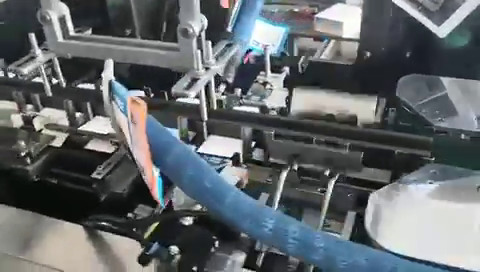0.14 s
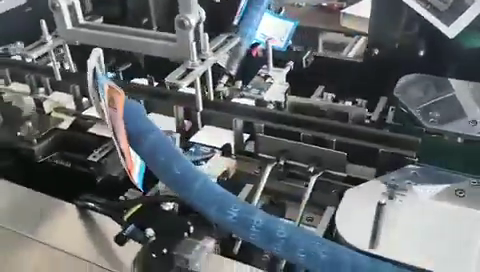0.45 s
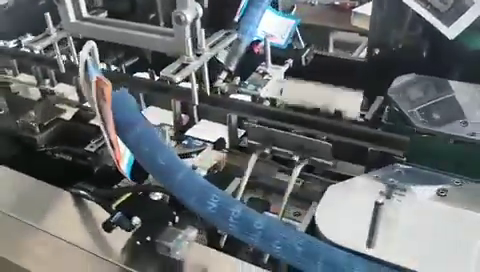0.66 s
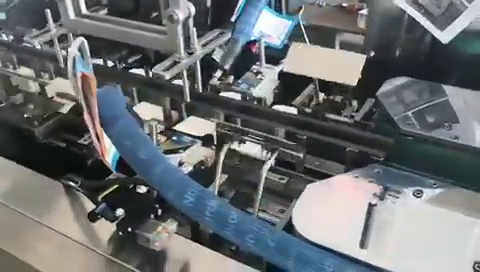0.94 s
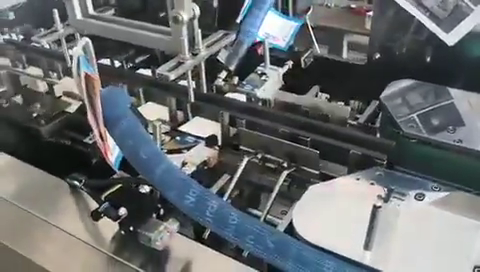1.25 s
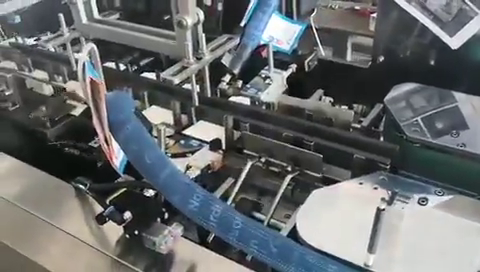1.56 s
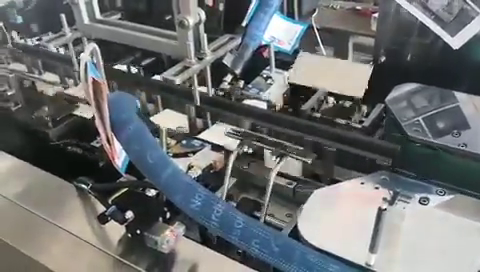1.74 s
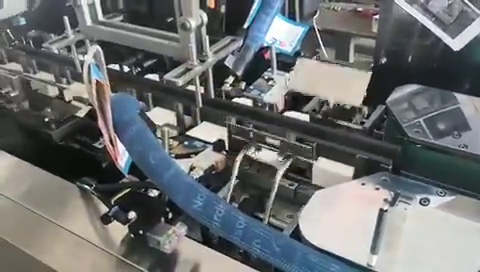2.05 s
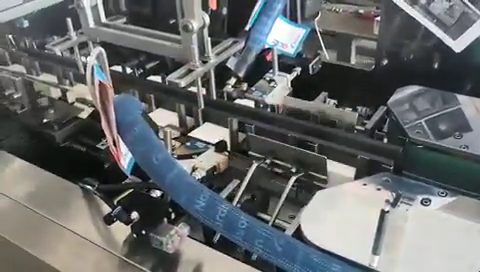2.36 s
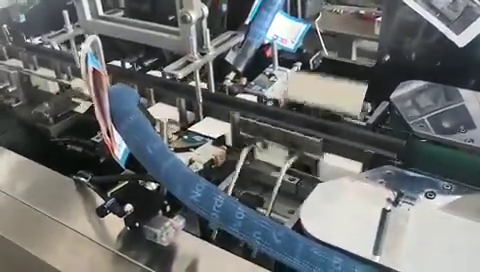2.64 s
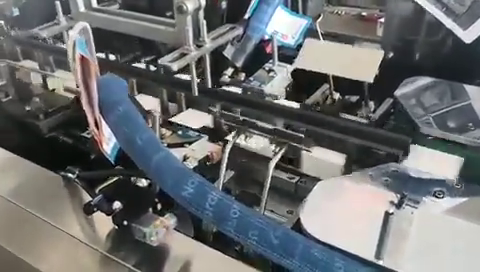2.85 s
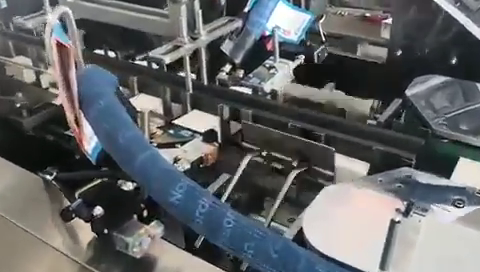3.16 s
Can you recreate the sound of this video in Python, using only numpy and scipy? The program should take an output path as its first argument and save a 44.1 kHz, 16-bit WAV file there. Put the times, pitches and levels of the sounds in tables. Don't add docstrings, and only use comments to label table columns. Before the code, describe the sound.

Close stereo pickup of a packaging machine: clusters of dry metallic clacks and sharp clicks repeat roughly every second, with one deep early thump, puffs of air, steady rumble, thin whine and slight hall echo.

```python
import sys
import numpy as np
from scipy import signal
from scipy.fft import rfft, irfft, next_fast_len
from scipy.io import wavfile

SR = 44100
rng = np.random.default_rng(int(sys.argv[2]) if len(sys.argv) > 2 else 0)


def put_to_file(sound):
    columns = np.atleast_2d(sound).T
    safe = np.clip(columns, -1, 1)
    whole_steps = np.round(safe * 32767)
    wavfile.write(sys.argv[1], SR, whole_steps.astype(np.int16))


def decibels_to_gain(level_db):
    exponent = np.asarray(level_db, float) / 20
    return 10 ** exponent


N = 145530

# frequency in Hz, left-right correlation.
PORT_LIKENESS = [(30,.997),(180,0.95),(300,0.95),(500,0.35),(800,0.37),(1200,.6),(2000,0.53),(5000,0.12)]
# frequency in Hz, left over right in dB.
PORT_BALANCE = [(250, 0), (450, -2), (740, 3), (1220, 0.2), (2010, -5), (2600, -11), (3600, -2),
                (5500, -1.6), (9000, -2.5), (15000, -1.5)]
# frequency in Hz, lead of the left port in radians.
PORT_LEAD = [(300,0),(600,1.03),(1290,0.07),(2760,-3),(4310,-10.4),(6030,-2.5),(8270,-9.5),(12500,1)]

# time in seconds, whirr level in dB, rumble level in dB.
LOAD = [(0,-29.5,-0.5),(.25,-30,-2.5),(.6,-33.5,-1.5),(.8,-35,0),(1.1,-37,-2.5),(1.4,-34,-3),(1.6,-34.5,0.5),(1.9,-35.5,-2),
        (2.2,-35.5,-3),(2.55,-37.5,-1.5),(2.9,-36.5,-4),(3.3,-38.5,-4)]
# frequency in Hz, density in dB per Hz.
RUMBLE = [(12, -29), (20, -2), (80, 1), (215, 1), (312, -8), (370, -6), (412, -12), (527, -17), (800, -15),
          (1040, -22.5), (1760, -120)]
# frequency in Hz, density in dB per Hz.
WHIRR = [(290, -38), (500, -17.5), (1200, -1.5), (1470, -3.5), (2430, 5), (3120, -9), (4480, -11),
         (5080, -9.5), (6000, -14.5), (7800, -85), (13200, -120)]
# frequency in Hz, density in dB per Hz.
LEAK = [(2400, 0), (3000, -4), (4000, -6), (6300, -5.5), (7800, 1.5), (8600, -16), (10000, -17.5),
        (15300, -33)]
# frequency in Hz, density in dB per Hz.
AIR = [(3000, -3), (4500, -9.5), (6200, -6), (7900, 3), (8600, -10), (10000, -33.5), (15000, -22.5),
       (15400, -51)]

WHINE_HZ = [4731, 4911, 5030, 5091, 5270]
WHINE_DB = [-57, -48, -59, -52, -58]
# time in seconds, level of the lower lines in dB, of the upper lines in dB.
DRIVE = [(0,10,7),(.08,-12,-6),(.22,6,1),(.36,-10,-3),(.65,-7,-6),(.8,0.5,-6),(1.4,0,-4),(1.55,-8,-3),(1.88,-8,2),
         (1.96,-12,3),(2.18,-8,1),(2.3,-0.5,0),(2.46,3,-11),(2.55,-10,-4),(2.66,-3.5,-6),(3.3,4,5)]

# frequency in Hz, width in Hz, level in dB.
RAIL = [(2020,60,-54),(2798,80,-31),(3210,270,-32),(4140,200,-38.5),(5500,220,-38)]
# time in seconds, level in dB.
SLIDE = [(0,-1.5),(.04,-5.5),(.14,-2.5),(.21,-7.5),(.27,-17),(.4,-47),(3.3,-40)]

# start in seconds, level in dB, rise in seconds, hold in seconds.
BLOWS = [
    (-.1,-45,.04,0.16),
    (0.342,-45.5,0.074,0.16),
    (1.33,-42.5,0.12,0.19),
    (1.647,-52,0.018,0.024),
    (2.313,-42.5,0.11,0.19),
    (3.24,-54,0.027,.1),
]

# time in seconds, peak in dB, rattle length in seconds, loudest pitch in Hz.
SNAPS = [(0.4625,-13,0.0099,7400),(0.5134,-1,0.0036,7400),(0.606,-10.5,0.0098,6900),(.8599,-8.5,0.0063,5500),(0.906,-12,0.0042,5500),(.9168,-12.5,0.017,7500),
         (1.496,-0.5,0.0054,7950),(1.592,-8,0.01,7340),(1.846,-13.5,0.0073,5100),(1.8906,-9.5,0.006,4260),(1.901,-11.5,0.017,4600),
         (2.4796,-1,0.0062,7950),(2.573,-8,0.013,6500),(2.8747,-8,.004,4160),(2.8897,-16.5,0.02,7500),(3.259,-23,.006,6000)]
# frequency in Hz, level in dB, 60 dB decay in seconds.
SNAP_MODES = [(3300, -8, 0.0019), (4200, 1, 0.0022), (5340, -2.5, 0.0036), (5800, -1.5, 0.0034),
              (6900, -4.5, 0.0061), (7200, 0.5, 0.004), (7810, -1.5, 0.0054), (8840, -10, 0.0034),
              (11300, -11, 0.0012), (14100, -20, 0.0032)]
# time in seconds, peak in dB, hollowness (low modes) in dB,
# rattle length in seconds, loudest pitch in Hz.
CLACKS = [(.46,-2,-2,0.0058,1520),(.471,-4,-4.5,0.0075,1900),(.513,-5,-13,0.0054,2600),(.558,-11,-5,0.0048,1880),(.607,-4,-7.5,0.0046,2010),
          (.798,-11.5,-1.5,0.017,2180),(.86,-15.5,-7,0.0065,2500),(.905,-9.5,-7,.01,2320),(.915,-3.5,-7,0.0056,2620),(.949,-12.5,-4.5,0.0077,2100),
          (1.402,-17.5,-22,0.0076,2000),(1.45,-15.5,-14,0.012,2600),(1.472,-10.5,-6.5,0.014,1630),(1.496,-6.5,-18,0.0083,2700),(1.577,-12.5,-3,0.015,2100),
          (1.591,-4.5,-5,0.006,1980),(1.783,-13.5,-12,0.0083,2080),(1.843,-14.5,-14,0.0047,2600),(1.89,-11,-12,0.0085,2200),(1.9,-1,-4,0.0066,2350),
          (1.934,-13,-4,0.0038,2050),(2.389,-11.5,-17,0.0072,2220),(2.453,-19,-5.5,0.011,1540),(2.48,-6,-6.5,0.009,2660),(2.531,-12.5,-11,0.014,2100),
          (2.561,-8,-6,0.015,2220),(2.574,-5,-5.5,0.0093,2060),(2.77,-11.5,0.5,0.01,2400),(2.874,-10,-4.5,0.0053,2430),(2.885,-1,-5,.006,2450)]
# time in seconds, peak in dB,
# hollowness (low modes) in dB, # rattle length in seconds, loudest pitch in Hz.
MORE_CLACKS = [(0.229,-28,-1,0.0073,1150),(.479,-15,-6,0.015,2300),(0.49,-10,-14,0.0069,2200),(0.592,-14.5,-4,0.01,1970),(0.804,-18,-18,.008,3500),
               (1.271,-22,-5,0.011,1800),(1.524,-15.5,-10,0.0097,2200),(1.794,-13,1,0.008,3600),(1.976,-28,6.5,0.0077,1790),(2.286,-17.5,-6,0.0076,1860),
               (2.445,-17,-10,0.02,2530),(2.635,-19.5,-23,0.025,2620),(2.919,-8,-8,0.0069,2200),(2.956,-17,-4.5,0.021,1730),(3.268,-19,-11,.023,2000)]
# frequency in Hz, level in dB, 60 dB decay in seconds.
CLACK_MODES = [(940, -7, 0.041), (1092, 0.5, 0.033), (1497, 7.5, 0.006), (1815, -2.5, 0.017),
               (2086, 1, 0.01), (2460, 1.5, 0.013), (2695, 0.5, 0.011), (3050, -6.5, 0.007),
               (3310, -9.5, 0.0074), (3890, -4, 0.0062)]
# time in seconds, peak in dB, pitch in Hz, contact in seconds, recoil in dB.
THUMPS = [
    (.451,-5.5,136,0.0059,-6),
    (.605,-14.5,262,0.002,6.5),
    (1.5901,-17.5,250,0.0006,7.5),
    (2.573,-14.5,248,0.0015,7),
]


def rms_one(x):
    return x / np.sqrt(np.mean(x ** 2) + 1e-20)


def in_time(rows):
    s, *columns = np.transpose(rows)
    return [np.interp(np.arange(N) / SR, s, column) for column in columns]


def at_hz(points, hz):
    table_hz, value = np.array(points).T
    return np.interp(np.log(hz), np.log(table_hz), value)


def ports(hz):
    return decibels_to_gain(at_hz(PORT_BALANCE, hz) / 2 * np.array([[1], [-1]]))


def drift(rate):
    step = 40
    r = np.exp(-2 * np.pi * rate * step / SR)
    noise = rng.standard_normal(N // step + 2002)
    slow = signal.lfilter([1], [1, -2 * r, r * r], noise)[2000:]
    return np.interp(np.arange(N) / step, np.arange(len(slow)), rms_one(slow))


def ring(clicks, hz, t60):
    r, w = decibels_to_gain(-60 / (t60 * SR)), 2 * np.pi * hz / SR
    return signal.lfilter([0, np.sin(w)], [1, -2 * r * np.cos(w), r * r], clicks + 1e-18)


def soft(x, cut_hz, kind="low"):
    return signal.sosfilt(signal.butter(2, cut_hz, kind, fs=SR, output="sos"), x)


def hiss(spectrum, patchy_db, rate, count):
    hz = np.maximum(np.arange(N // 2 + 1) * SR / N, 1)
    low, high = spectrum[0][0], spectrum[-1][0]
    sides = np.array([[1], [-1]])
    mid, side = rfft(rng.standard_normal((2, N)))
    alike = at_hz(PORT_LIKENESS, hz)
    both = np.sqrt(1 + alike) * mid + np.sqrt(1 - alike) * side * sides
    both = both * ports(hz) * np.exp(0.5j * at_hz(PORT_LEAD, hz) * sides)
    both = both * decibels_to_gain(at_hz(spectrum, hz)) * (hz > low) * (hz < high)
    place = np.log(hz / low) / np.log(high / low) * (count - 1)
    together = drift(rate)
    out = 0
    for k in range(count):
        band = np.sqrt(np.clip(1 - abs(place - k), 0, 1))
        flicker = decibels_to_gain(patchy_db * (1.27 * together + drift(rate)))
        out = out + flicker * irfft(both * band, N)
    return rms_one(out)


def rumble():
    _, rumble_db = in_time(LOAD)
    return decibels_to_gain(rumble_db - 30) * hiss(RUMBLE, patchy_db=1.78, rate=5.3, count=6)


def whirr():
    whirr_db, _ = in_time(LOAD)
    return decibels_to_gain(whirr_db + 3) * hiss(WHIRR, patchy_db=0.6, rate=20, count=6)


def leak():
    whirr_db, _ = in_time(LOAD)
    return decibels_to_gain(whirr_db - 6) * hiss(LEAK, patchy_db=1.66, rate=15, count=6)


def whine():
    t = np.arange(N) / SR
    lower_db, upper_db = in_time(DRIVE)
    port_turns = np.array([[0], [0.21]])
    out = 0
    for hz, db in zip(WHINE_HZ, WHINE_DB):
        load_db = upper_db if hz > WHINE_HZ[1] else lower_db
        level = np.sqrt(2) * decibels_to_gain(db + load_db + 0.59 * drift(16))
        start_turns = rng.random(2)[0]
        out = out + level * np.sin(2 * np.pi * (hz * t + start_turns + port_turns))
    return decibels_to_gain([[3.0], [-3.0]]) * out


def slide():
    pressure_db, = in_time(SLIDE)
    rub = rng.standard_normal((2, N))
    level = decibels_to_gain(pressure_db + 1.8 * drift(30))
    return level * sum(decibels_to_gain(db) * ports(hz) * rms_one(ring(rub, hz, 3.8 / width)) for hz, width, db in RAIL)


def valve():
    t = np.arange(N) / SR
    fall_s = 0.091
    flow = decibels_to_gain(-65.0)
    for s, db, rise_s, hold_s in BLOWS:
        rise = np.clip((t - s) / rise_s, 0, 1)
        flow = flow + decibels_to_gain(db) * rise * np.exp(-np.maximum(t - s - hold_s, 0) / fall_s)
    return flow * decibels_to_gain(12) * hiss(AIR, patchy_db=2.5, rate=13, count=6)


def rattles(s, db, length):
    hits_per_s, swarm_db, uneven_db, firm_s, port_lag = 5000, -6.5, 3, 0.0057, 5
    clicks, which = np.zeros((2, N + SR)), np.zeros(N + SR, int)
    t = np.arange(SR // 20) / SR
    for k in range(len(s)):
        i = int(s[k] * SR)
        hits = rng.random(len(t)) < hits_per_s / SR
        height = decibels_to_gain(swarm_db + uneven_db * rng.standard_normal((2, len(t))))
        swarm = hits * height * rng.choice([-1, 1], (2, len(t)))
        swarm[:, 0] = min(1, firm_s / length[k]) ** 2
        clicks[:, i:i + len(t)] += decibels_to_gain(db[k]) * swarm * np.exp(-t / max(length[k], 0.001))
        which[i:] = k
    clicks[0] = np.roll(clicks[0], port_lag)
    return clicks[:, :N], which[:N]


def focus(hz, centre_hz, octave_loss_db):
    return -octave_loss_db * np.minimum(np.log2(hz / centre_hz) ** 2, 1.5)


def snaps():
    s, db, length, centre_hz = np.transpose(SNAPS)
    clicks, which = rattles(s, db - 6, length)
    strike_db = rng.normal(0, 1.5, (len(s), len(SNAP_MODES)))
    out = 0
    for k, (hz, level_db, t60) in enumerate(SNAP_MODES):
        gain = decibels_to_gain(level_db + strike_db[:, k] + focus(hz, centre_hz, 8))
        out = out + (-1) ** k * ports(hz) * ring(clicks * gain[which], hz, t60)
    return soft(out, 14700)


def clacks():
    s, db, hollow_db, length, centre_hz = np.transpose(sorted(CLACKS + MORE_CLACKS))
    clicks, which = rattles(s, db - 10, length)
    ticks_per_s, tick_db, tick_uneven_db = 96, -52.5, 4
    ticks = rng.random(N) < ticks_per_s / SR
    ticks = ticks * decibels_to_gain(tick_db + tick_uneven_db * np.minimum(rng.exponential(1, N), 4))
    strike_db = rng.normal(0, 1.5, (len(s), len(CLACK_MODES)))
    out = 0
    for k, (hz, level_db, t60) in enumerate(CLACK_MODES):
        gain = decibels_to_gain(strike_db[:, k] + focus(hz, centre_hz, 8.5) + hollow_db * (hz < 1600))
        drive = clicks * gain[which] + ticks * rng.standard_normal((2, N))
        out = out + (-1) ** k * ports(hz) * ring(decibels_to_gain(level_db) * drive, hz, t60)
    return soft(out, 3400)


def thumps():
    recoil_s, echo_s, echo_db = 0.00364, 0.021, -10.5
    out = np.zeros(N)
    for s, db, hz, contact_s, recoil_db in THUMPS:
        click = np.zeros(N)
        click[int(s * SR)] = decibels_to_gain(db)
        click[int((s + echo_s) * SR)] = decibels_to_gain(db + echo_db)
        click[int((s + recoil_s) * SR)] = -decibels_to_gain(db + recoil_db)
        contact = np.hanning(int(contact_s * SR)) * 2 / (contact_s * SR)
        push = np.convolve(click, contact)[:N]
        out += ring(push, hz, 0.029)
        out += decibels_to_gain(-8) * ring(push, 565, 0.0092)
        out += decibels_to_gain(3) * ring(push, 379, 0.0099)
        out += decibels_to_gain(-11.5) * ring(push, 122.5, 0.11)
        out += decibels_to_gain(-22) * ring(push, 202.2, 0.43)
    return soft(out, 91, "high")


def hall(x):
    t60_s, wall_cut_hz = 0.3, 7700
    size = next_fast_len(N + SR)
    w = 2 * np.pi * np.arange(size // 2 + 1) / size
    dull = 1 / (1 + 1j * w * SR / (2 * np.pi * wall_cut_hz))
    out = 0
    for k, lag in enumerate(rng.uniform(0.015, 0.05, (8, 2, 1)) * SR):
        loop = decibels_to_gain(-60 * lag / SR / t60_s) * dull * np.exp(-1j * w * lag)
        out = out + (-1) ** k * loop / (1 - loop)
    return irfft(out * rfft(x, size), size)[:, :N]


def scene():
    metal = clacks() + snaps()
    heavy = thumps()
    echoes = decibels_to_gain(-13.5) * (hall(metal) + hall(heavy)[0])
    impacts = metal + heavy + echoes
    return impacts + whine() + slide() + valve() + leak() + whirr() + rumble()


def band_limit(x):
    return signal.sosfilt(signal.butter(12, 16360, fs=SR, output="sos"), x)


def record(dry):
    rounded = 1.5 * np.tanh(dry / 1.5)
    finished = signal.sosfilt(signal.cheby2(12, 30, 15750, fs=SR, output="sos"), rounded)
    return band_limit(finished)


dry = scene()
out = record(dry)
put_to_file(out)
```